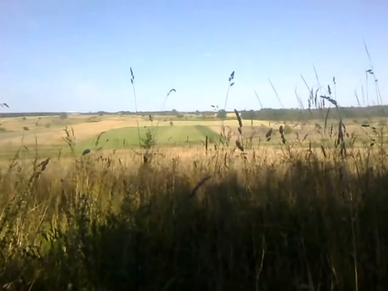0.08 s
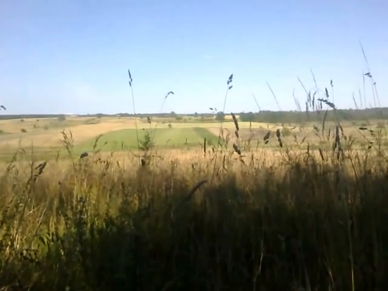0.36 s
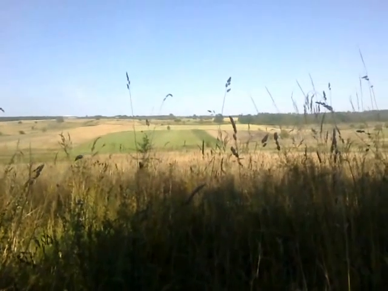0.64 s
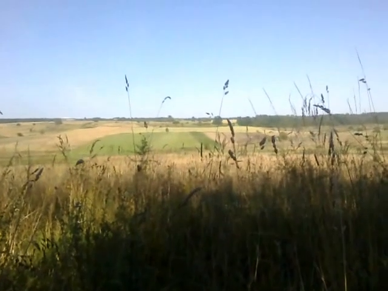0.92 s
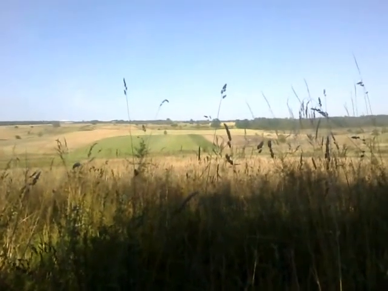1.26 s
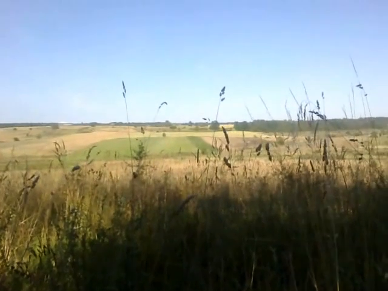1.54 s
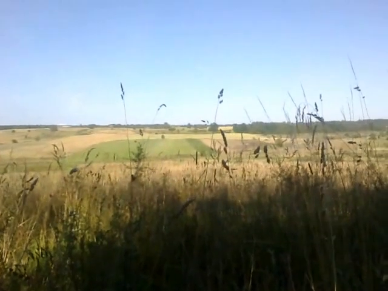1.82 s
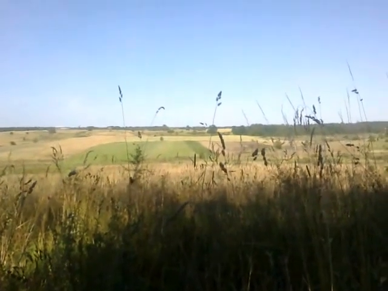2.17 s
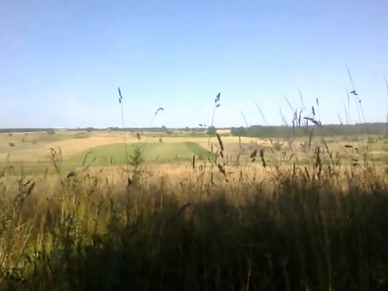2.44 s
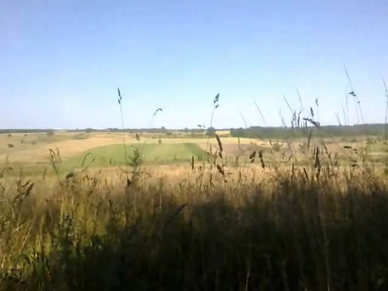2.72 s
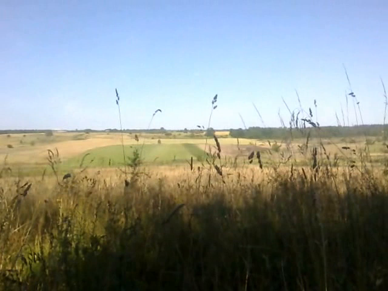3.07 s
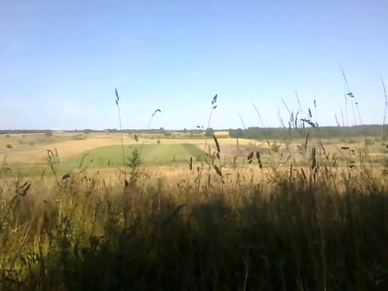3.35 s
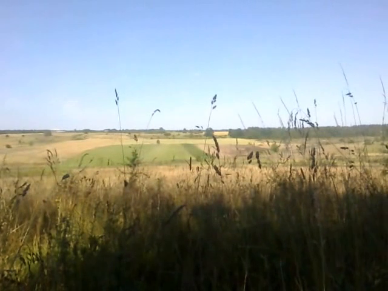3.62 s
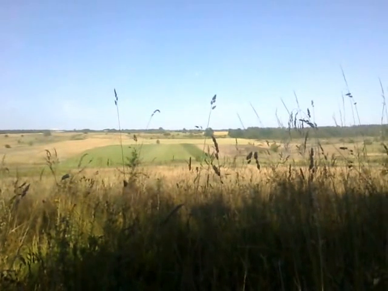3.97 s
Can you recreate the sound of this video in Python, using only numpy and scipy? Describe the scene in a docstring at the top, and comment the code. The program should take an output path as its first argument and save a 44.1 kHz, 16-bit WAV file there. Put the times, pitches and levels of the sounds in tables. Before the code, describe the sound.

Grasshoppers rasp in fast, high pulses close by in a dry meadow, over a distant sizzling chorus. One dull tap falls midway. Faint hiss, soft grass rustles and light wind on the microphone lie beneath, with a faint far engine late.

```python
"""A dry meadow in mono. Four near grasshoppers rasp leg files over their wings, each at its own stroke
rate, scattered by the grass, over a far chorus, faint open air, soft rustles and wind on the microphone.
One leads and drops away at 1 s, as a low and a high singer come forward side by side. A dull tap falls
at 2.1 s. After 3 s a distant engine drone crests and the quickest singer swells to the front."""
import sys
import numpy as np
from scipy import signal
from scipy.fft import rfft, irfft, next_fast_len
from scipy.io import wavfile
from scipy.ndimage import map_coordinates

SR = 44100
rng = np.random.default_rng(int(sys.argv[2]) if len(sys.argv) > 2 else 0)


def output_pcm(signal):
    """Save a mono or channel-first signal as 16-bit PCM at the path in sys.argv[1].

    Samples are clipped to [-1, 1] before scaling.
    """
    pcm = np.clip(np.atleast_2d(signal).T, -1, 1) * 32767
    wavfile.write(sys.argv[1], SR, np.round(pcm).astype(np.int16))


N = 176400


def amp(db):
    """Decibels to gain."""
    return 10 ** (np.asarray(db) / 20)


def unit(x):
    """Scale to rms 1."""
    return x / np.sqrt(np.mean(x ** 2) + 1e-20)


def curve(rows):
    """An automation line through (t/s, value) points, held flat beyond both ends."""
    return np.interp(np.arange(N) / SR, *np.transpose(rows))


def swell(s, half_s):
    """A bell-shaped rise and fall around time s."""
    return np.exp(-((np.arange(N) / SR - s) / half_s) ** 2)


def wobble(rate):
    """A smooth random curve, rate knots a second."""
    return map_coordinates(rng.standard_normal(N // 100), [np.arange(N) * rate / SR], mode="wrap")


def coloured(x, eq):
    """x through a causal EQ of (f/Hz, level/dB) points, at rms 1 over the whole scene."""
    m = 2 * next_fast_len(N // 2 + 8192)
    hz, db = np.transpose(eq)
    gain = amp(np.interp(np.log(np.fft.rfftfreq(m, 1 / SR) + 1), np.log(hz), db))
    cepstrum = irfft(np.log(gain))
    cepstrum[1:m // 2] *= 2  # fold to minimum phase: no ringing ahead of a hit
    cepstrum[m // 2 + 1:] = 0
    return unit(irfft(rfft(x, m) * np.exp(rfft(cepstrum)), m)[:N])


def noise(eq):
    """Coloured noise of rms 1."""
    return coloured(rng.standard_normal(N), eq)


def grasshopper(song, tempo, wing, rise_s, fall_s, return_db, tooth_hz, jitter, tooth_spread_db,
                scatter_db, t60_s, sway_db=0.3544):
    """File teeth strike the resonant wing in a swelling stroke, then softly on the way back."""
    crest_s, rates = tempo
    rate = curve(rates)
    phase = np.cumsum(rate) / SR
    phase -= np.interp(crest_s, np.arange(N) / SR, phase)
    from_crest_s = (phase - np.round(phase)) / rate
    stroke = np.exp(-(from_crest_s / np.where(from_crest_s < 0, rise_s, fall_s)) ** 2)
    back_stroke = amp(return_db) * np.sin(np.pi * phase) ** 2
    pressure = (stroke + back_stroke) * amp(sway_db * wobble(25.005))  # no two strokes alike
    spacing, strength = rng.standard_normal((N // 10, 2)).T
    hits = np.round(np.cumsum(np.exp(jitter * spacing)) * SR / tooth_hz).astype(int)
    teeth = np.bincount(hits[hits < N], amp(tooth_spread_db * strength[hits < N]), N)
    return amp(curve(song)) * coloured(grass(teeth * pressure, scatter_db, t60_s), wing)


def singers():
    """Four near voices: one leads early, two run side by side, the quickest swells late."""
    # Fader rides: t/s, level/dB
    opener_song = [(0, -45.5), (.25, -43.5), (.65, -43), (.93, -45.5), (1.01, -60)]
    low_song = [(.88, -53.5), (1.25, -48.5), (2.6, -50.5), (4, -49)]
    high_song = [(0, -56.5), (1.1, -48.5), (2.5, -47), (4, -46.5)]
    late_song = [(3.1, -56.5), (3.45, -52.5), (3.7, -50.5), (4, -44.5)]
    # Leg tempo: t/s of one stroke's crest, then rows of t/s, stroke rate/Hz
    opener_tempo = (.0055, [(0, 30.8), (1, 28.4)])
    low_tempo = (.9565, [(1, 29.9), (2.8, 29.88), (4, 29.55)])
    high_tempo = (.0336, [(0, 24.6), (1.1, 23.75), (2.5, 23.5), (3.3, 23.4), (4, 22.95)])
    late_tempo = (3.463, [(3, 32.6), (4, 32.8)])
    # Wing resonances: f/Hz, relative level/dB
    opener_wing = [(5500, -40.5), (6600, -18), (7100, -8), (7400, 0.5), (7700, -7), (8000, -12.5),
                   (8250, -6), (8700, -10.5), (10200, -13.5), (11500, -33.5), (15000, -44)]
    low_wing = [(5800, -35.5), (6400, -17), (6850, -6), (6990, -8.5), (7230, 2.5), (7500, -3.5), (7950, -5),
                (8170, -3.5), (8600, -13.5), (8860, -3.5), (9500, -11.5), (11000, -25), (15000, -37)]
    high_wing = [(6500, -31), (7700, -23), (8200, -4.5), (8500, -11), (8900, -4.5), (9350, -8), (9760, 0.5),
                 (10050, -3), (10400, -5), (10750, -2), (11100, -3), (11400, -8.5), (11850, -8),
                 (12200, -15), (13100, -21.5), (15500, -31)]
    late_wing = [(6800, -32), (8200, -4.5), (9000, -7), (9400, -6), (9800, -1.5), (10500, -3.5),
                 (11500, -29), (15000, -26.5)]
    opener = grasshopper(opener_song, opener_tempo, opener_wing,
                         rise_s=0.0066, fall_s=0.0049, return_db=-8,
                         tooth_hz=600.5, jitter=0.3, tooth_spread_db=0.6, scatter_db=-6, t60_s=0.05)
    low = grasshopper(low_song, low_tempo, low_wing,
                      rise_s=0.00473, fall_s=0.00478, return_db=-16.5,
                      tooth_hz=949.6, jitter=0.3, tooth_spread_db=0.22, scatter_db=-7, t60_s=0.056)
    high = grasshopper(high_song, high_tempo, high_wing,
                       rise_s=0.00778, fall_s=0.0058, return_db=-14,
                       tooth_hz=1685, jitter=0.16, tooth_spread_db=2.46, scatter_db=-2, t60_s=0.0404)
    late = grasshopper(late_song, late_tempo, late_wing,
                       rise_s=0.0096, fall_s=0.00324, return_db=-11,
                       tooth_hz=850.3, jitter=0.36, tooth_spread_db=-0.1, scatter_db=-2.5, t60_s=0.048)
    return opener + low + high + late


def grass(x, scatter_db, t60_s):
    """The direct sound plus a short spray of echoes from the stalks."""
    t = np.arange(SR // 10) / SR
    tail = rng.standard_normal(len(t)) * amp(-60 * t / t60_s)
    return x + amp(scatter_db) * signal.fftconvolve(x, tail / np.linalg.norm(tail))[:N]


def chorus(level_db=-47.5, flutter_db=0.9054, grain_db=1.06):
    """Many far grasshoppers merge into a grainy sizzle."""
    # Colour of the massed wings: f/Hz, relative level/dB
    sizzle_eq = [(5500, -41), (6500, -11.5), (7250, -2.5), (7700, -1.5), (8200, 0), (9200, -4.5),
                 (10200, -4), (11000, -6.5), (12200, -16), (15500, -30.5)]
    gain = amp(level_db + flutter_db * wobble(45))
    grains = rng.standard_normal(N) * amp(grain_db * wobble(420))
    return gain * coloured(grains, sizzle_eq)


def air(trim_db=1.55, waver_db=0.627):
    """The faint hiss of open country."""
    # Fader ride ahead of the trim: t/s, level/dB
    ride = [(0, -49.5), (.4, -49), (1, -49.5), (1.3, -51), (1.75, -49.5), (2.4, -50.5), (3, -51), (4, -51)]
    # Colour of the hiss: f/Hz, relative level/dB
    hiss_eq = [(30, 7.5), (100, 2.5), (200, 1.5), (310, -3.5), (450, -5), (690, -3), (1000, 2.5),
               (1300, -2), (1800, -1), (2300, -5), (3300, -2), (3800, -4), (4500, -10.5), (5400, -13.5),
               (8000, -9), (15500, -18.5)]
    return amp(curve(ride) + trim_db + waver_db * wobble(8.198)) * noise(hiss_eq)


def wind(lump_db=-0.96):
    """A light breeze rumbles on the microphone, with short puffs."""
    # Strength of the breeze: t/s, level/dB
    ride = [(0, -57), (.3, -71.5), (.9, -54), (1.2, -63.5), (2, -60.5), (2.4, -57), (3.1, -59.5),
            (4, -54.5)]
    # Puffs on top: t/s, level/dB, half length/s
    puffs = [(.33, -53, 0.075), (0.586, -39, 0.0154), (0.643, -54, 0.032), (0.895, -51, 0.0113),
             (0.982, -56, 0.0107), (2.335, -56, 0.023), (2.972, -49, 0.041), (3.275, -51.5, 0.046),
             (3.549, -48.5, 0.021), (3.62, -52.5, 0.032), (3.851, -56.5, 0.023)]
    # Colour of the rumble: f/Hz, relative level/dB
    rumble_eq = [(10, -7), (28, -3.5), (45, 0.5), (80, -15.5), (200, -22), (320, -40), (700, -41.5)]
    breeze = amp(curve(ride) + lump_db * wobble(12))
    buffeting = sum(amp(db) * swell(s, half_s) for s, db, half_s in puffs)
    return (breeze + buffeting) * noise(rumble_eq)


def rustles(skirt_db=-18):
    """The grass stirs in brief, soft swells of band noise."""
    # Rustles: t/s, level/dB, half length/s, centre f/Hz
    stirs = [(1.022, -55.5, 0.14, 1038), (1.704, -54.5, 0.044, 1020), (2.347, -49, 0.0058, 231),
             (2.496, -52.5, 0.022, 960), (3.532, -55, 0.0724, 879)]
    out = np.zeros(N)
    for s, db, half_s, hz in stirs:
        band = [(hz / 10, -45), (hz / 2, skirt_db), (hz, 0), (hz * 2, skirt_db), (hz * 10, -50)]
        out += amp(db) * swell(s, half_s) * noise(band)
    return out


def tap():
    """One dull tock: a bright contact and a softer one right behind it."""
    # Contacts: t/s, level/dB (rms over the whole scene), roll-off f/Hz
    contacts = [(2.0991, -61.5, 2940), (2.1012, -67, 610)]
    # Resonances of the struck body: f/Hz, relative level/dB
    body = [(100, -35), (250, -14), (400, 3.5), (540, 5.5), (780, -4.5), (1000, 0.5), (1250, -12),
            (1700, -13.5), (2600, -15), (5000, -30.5)]
    out = np.zeros(N)
    for s, db, rolloff_hz in contacts:
        blow = np.bincount([round(s * SR)], minlength=N)
        dulled_body = [(hz, level - 10 * np.log10(1 + (hz / rolloff_hz) ** 2)) for hz, level in body]
        out += amp(db) * coloured(blow, dulled_body)
    return out


def drone(drift_hz=1.429, waver_db=2):
    """A far engine hums, each partial wavering on its own."""
    # Fader ride: t/s, level/dB
    ride = [(0, -76), (1.8, -63.5), (2.3, -60), (3, -58), (3.4, -56.5), (4, -64)]
    # Engine partials: f/Hz, relative level/dB
    partials = [(104.7, -1), (125, -9.5), (146, -3.5), (167, -4)]
    hum = np.zeros(N)
    for hz, db in partials:
        gain = amp(db + waver_db * wobble(5))
        pitch_hz = hz + drift_hz * wobble(7)
        hum += gain * np.sin(2 * np.pi * np.cumsum(pitch_hz) / SR)
    return amp(curve(ride)) * unit(hum)


def scene():
    """The meadow mix, the same in both channels."""
    meadow = singers() + chorus() + air() + wind() + rustles() + tap() + drone()
    return np.array([meadow, meadow])


def record(dry):
    """A brick-wall low-pass takes off the very top."""
    cutoff_hz = 15720
    m = next_fast_len(N + SR // 2)
    passband = np.fft.rfftfreq(m, 1 / SR) < cutoff_hz
    return irfft(rfft(dry, m) * passband, m)[:, :N]


dry = scene()
out = record(dry)
output_pcm(out)
```